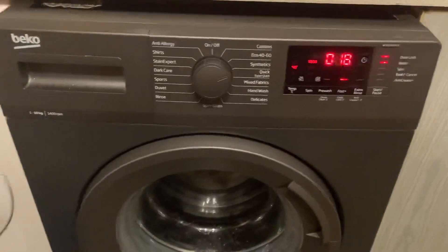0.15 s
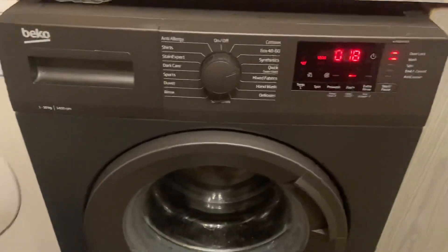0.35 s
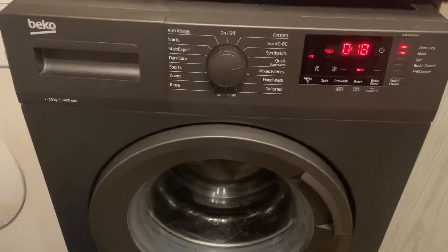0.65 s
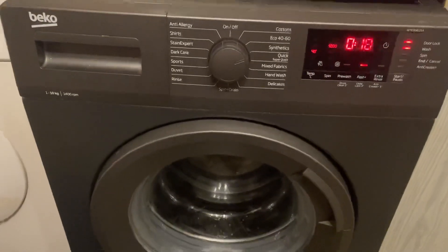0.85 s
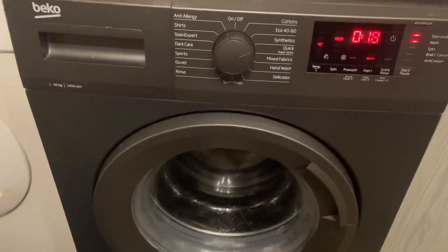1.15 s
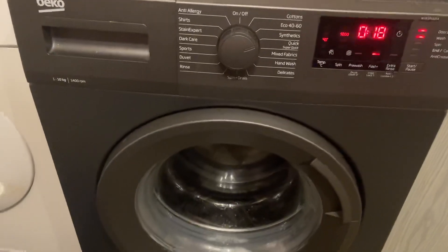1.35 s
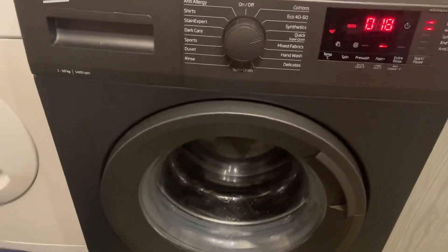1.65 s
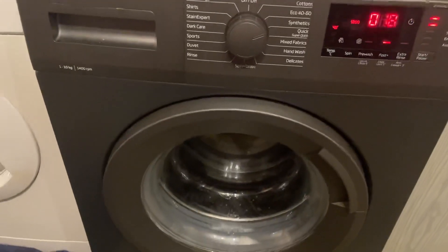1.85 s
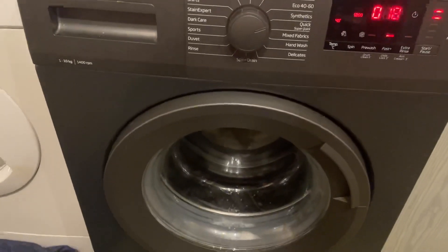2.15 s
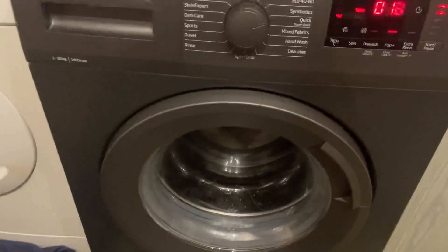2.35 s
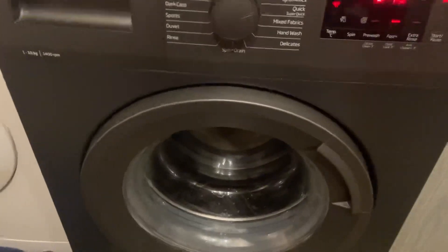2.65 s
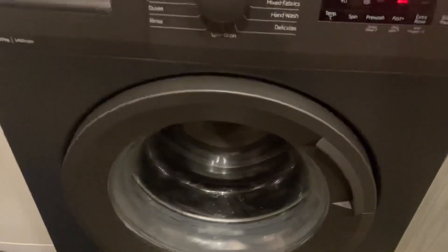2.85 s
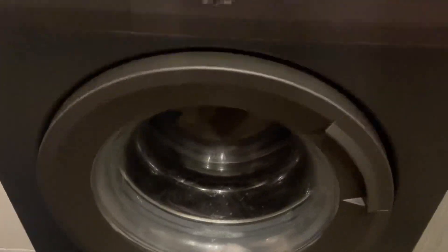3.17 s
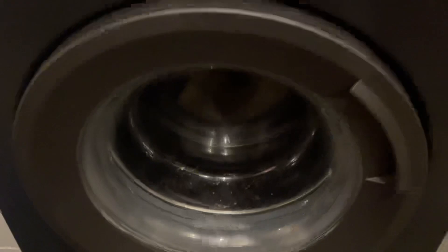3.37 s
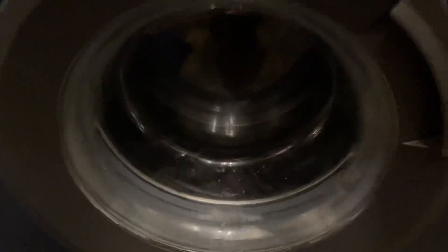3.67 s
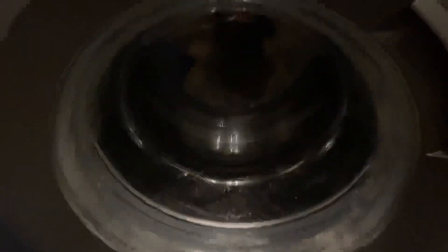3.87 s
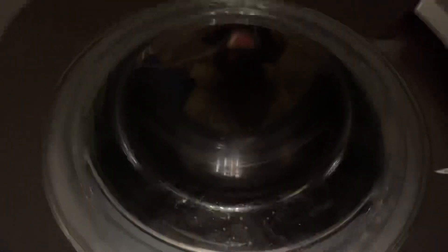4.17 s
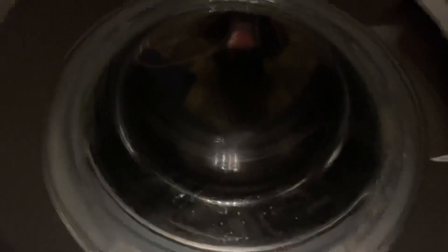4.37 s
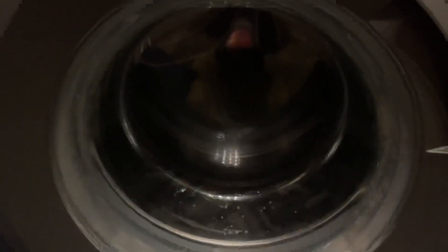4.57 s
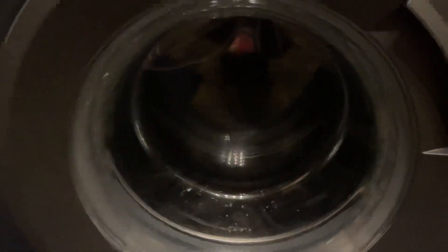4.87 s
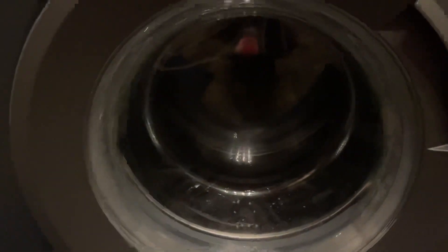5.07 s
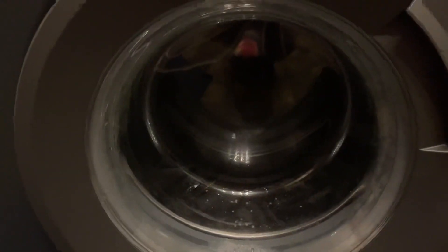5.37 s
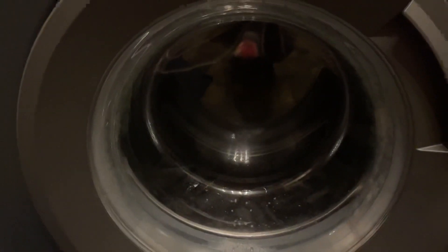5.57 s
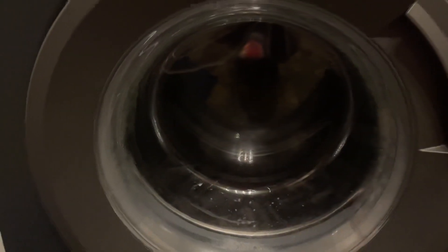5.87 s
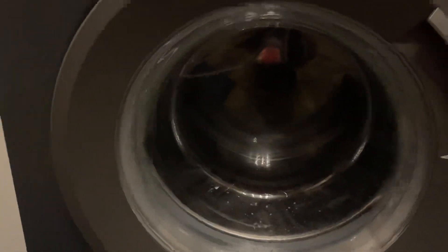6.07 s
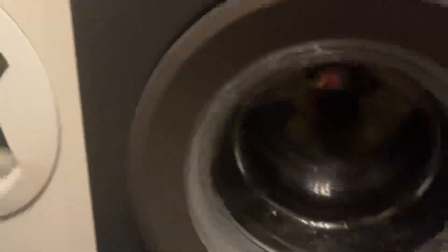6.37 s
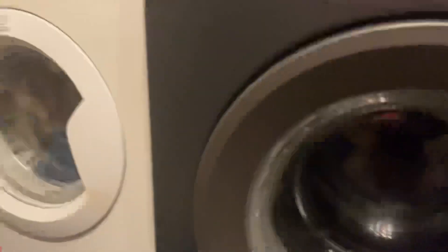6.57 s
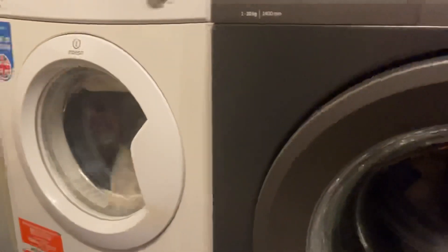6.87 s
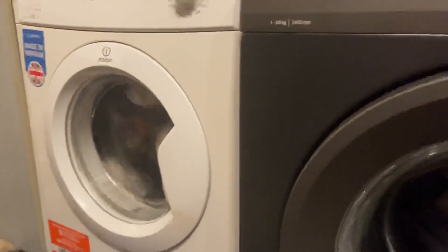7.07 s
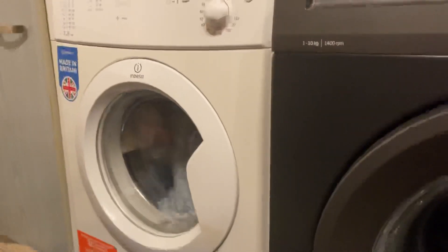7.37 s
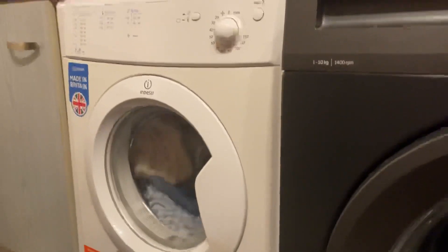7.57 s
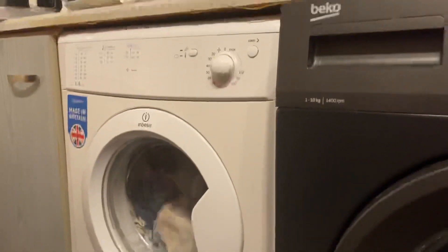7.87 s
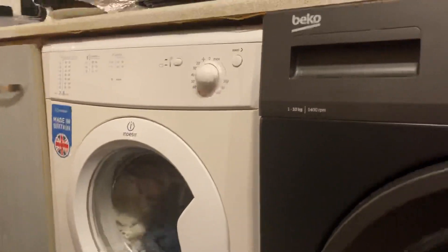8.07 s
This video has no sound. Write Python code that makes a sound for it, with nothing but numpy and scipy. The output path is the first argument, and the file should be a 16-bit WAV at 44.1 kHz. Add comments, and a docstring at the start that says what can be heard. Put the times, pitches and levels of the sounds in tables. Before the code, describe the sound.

Heard from a moving hand-held microphone in a small room, a washing machine and tumble dryer drone with rumbling rollers, fan roar and vent hiss. Tumbling clothes knock unevenly in the drum, with light metallic clicks and faint ringing taps that gather later on. Toward the end a brief low bump and two dry snaps sound nearby, the second sharper, and the drone turns quieter and duller.

```python
"""Tumble dryer and washing machine

Both run in a small room, heard from a hand-held phone that moves. Their motors hum at multiples of
the mains frequency, over rumbling rollers, fan roar and vent hiss. Laundry drops in the drum, buttons
clack on its steel, cloth swishes and one panel rings near 1 kHz. Near the end come a low bump and
two dry snaps close by, and the noise fades as the phone is lifted away."""
import sys
import numpy as np
from scipy import signal
from scipy.fft import rfft, irfft, next_fast_len
from scipy.io import wavfile
from scipy.ndimage import uniform_filter1d

SR = 44100
rng = np.random.default_rng(int(sys.argv[2]) if len(sys.argv) > 2 else 0)


def to_wav(s):
    """Save 16-bit WAV."""
    ch = np.atleast_2d(s).T  # columns
    pcm = np.round(np.clip(ch, -1, 1) * 32767)  # PCM
    wavfile.write(sys.argv[1], SR, pcm.astype(np.int16))


N = 362502

# Level changes as the phone is lowered and lifted: t/s, bass/dB, air noise/dB, roar/dB, top hiss/dB
PHONE_MOVES = [(0.0, -7, 3.5, 3, 2.5), (0.3, 1.5, 1, 2.5, 4), (0.6, -3.5, -3, -1.5, -1),
               (0.95, -3, -1.5, 0, -2), (1.4, -2.5, -2, -0.5, -2), (2.9, -0.5, 0, -0.5, 0.5),
               (3.7, 0.5, 0.5, -0.5, 1), (4.1, 1, 0, -1, 4), (4.6, 5.5, 2, 0, -0.5),
               (5.5, 1.5, 1, -0.5, -2.5), (6.7, 2.5, 0.9, 0, -4.5), (7.3, 1, 2.5, 0.5, -1),
               (7.42, 0, -0.5, -5.5, 1), (7.75, -8.5, -5.5, -5.5, -22), (8.22, -8, -6, -6, -23)]


def motors():
    """Magnetic pull makes tones at multiples of the mains frequency; the load makes them waver."""
    # tones the cabinets give off: multiple of the mains, level above the roar/dB, waver/dB
    cabinet_tones = [(5, -23.5, 5), (6, -19, -2.5), (7, -13, 2), (8, -23.5, 6.5)]
    # hum at twice the mains, as the phone crosses the room's standing waves: t/s, level/dB
    main_hum = [(0.0, -40), (0.8, -41), (1.3, -44), (1.7, -40.5), (2.25, -44.5), (3.05, -38.5), (3.4, -42),
                (3.75, -38.5), (4.2, -36), (4.9, -39.5), (5.27, -35), (5.55, -40), (6.05, -36.5),
                (7.17, -39), (7.42, -45), (7.8, -46), (8.1, -43.5), (8.22, -43.5)]
    # blurred overtones: t/s, third multiple/dB, fourth multiple/dB
    overtones = [(0.0, -60, -61), (0.7, -51, -54), (1.35, -57.5, -52.5), (2.5, -49.5, -54.5),
                 (2.85, -68, -54.5), (3.8, -47, -61), (4.5, -50.5, -64), (4.95, -46, -57), (5.7, -53, -62),
                 (6.9, -47, -65), (7.39, -54, -56), (7.8, -47.5, -62), (8.22, -50.5, -55)]
    mains_hz, roar_db = 49.95, -44.5 + curve(PHONE_MOVES, 3)
    turns = mains_hz * np.arange(N) / SR
    tones = [(2, curve(main_hum, 1), 1.3)]
    tones += [(k, db + roar_db, waver_db) for k, db, waver_db in cabinet_tones]
    hum = np.zeros(N)
    for k, db, waver_db in tones:
        level = gain_of(db + waver_db * wander(9))
        hum += np.sqrt(2) * level * np.sin(2 * np.pi * k * (turns + 0.03 * wander(3)))
    for k, width_hz, column in ((3, 13, 1), (4, 6, 2)):
        band = evened(resonate(rng.standard_normal(N), k * mains_hz, width_hz))
        hum += gain_of(curve(overtones, column)) * steadied(band, 0.6)
    return hum * panned(0.99)


def rollers_and_fan():
    """Drum rollers rumble, the steel cabinets roar with the fan, and air rushes and hisses in the vent."""
    # the tone colour of each noise: f/Hz, level/dB
    rumble = [(25, -49), (34, -33), (44, 3.5), (60, 1.5), (80, 3), (108, -1), (125, -5.5), (170, -8.5),
              (230, -20), (400, -64)]
    roar = [(88, -19.5), (150, -1.5), (183, -10.5), (297, -5), (345, -7), (388, -7.5), (490, -12),
            (555, -8.5), (808, -11.5), (955, -13.5), (1100, -25), (1430, -48), (2420, -120)]
    rush = [(600, -37), (1000, 1), (1350, -3.5), (1700, 0.5), (2400, -3), (3000, -5), (3800, -11),
            (6000, -21)]
    hiss = [(2000, -29), (3500, -6.5), (4500, 0), (6000, -2), (7000, -3.5), (9300, 3.5), (10200, -10),
            (11000, -50)]
    top_hiss = [(9500, -60), (10300, 5), (11500, 1), (13000, -25.5)]
    bass_db, air_db, roar_db, top_db = (curve(PHONE_MOVES, column) for column in (1, 2, 3, 4))
    tumbling = wander(12)  # the load shakes every cabinet at once
    return (room_noise(rumble, 0.5, -1.5, 4096) * gain_of(-46 + bass_db)
            + room_noise(roar, 0.5, 1.6, 2048) * gain_of(-44.5 + roar_db + 0.65 * tumbling)
            + room_noise(rush, 1.5, 1.7, 2048) * gain_of(-48.5 + 0.38 * air_db + 0.25 * tumbling)
            + room_noise(hiss, 2, 0.5, 1024) * gain_of(-59.5 + 0.83 * air_db + 0.3 * tumbling)
            + room_noise(top_hiss, 2.5, 1, 1024) * gain_of(-68 + top_db + 0.48 * tumbling))


def laundry_drops():
    """Falling laundry rings the drum, then the cabinet booms; harder items sound brighter."""
    # blows: t/s, peak/dB, boom/dB, brightness/(dB per octave), pitch favoured by the spot hit/Hz
    blows = [(0.188, -54, -50, 6, 2024), (0.389, -62, -35, 5, 2024), (1.349, -33.5, -56, -1, 1390),
             (2.019, -35.5, -36.5, 1, 640), (2.297, -44.5, -54, -2, 720), (2.573, -37.5, -46, -1.5, 645),
             (2.874, -40.5, -50, -2, 1000), (3.156, -42, -55, -14, 550), (3.637, -40, -48, -3, 1900),
             (3.688, -40, -49, 1, 2400), (4.522, -37, -55, -5.5, 750), (4.741, -29, -32.5, -1.5, 745),
             (5.687, -43, -38, 1, 968), (5.87, -43, -54, 1, 850), (6.379, -43, -52, 1, 550),
             (6.483, -40.5, -49, -8, 700), (7.081, -38, -52, -7, 720), (7.236, -36.5, -55, -2, 1570)]
    # the drum's resonances: f/Hz, width/Hz, level/dB
    drum_modes = [(425, 120, -1), (603, 110, 5), (723, 105, 8.5), (974, 170, 11), (1287, 120, 7),
                  (1560, 220, 8.5), (1990, 420, 8.5), (2570, 290, 6), (3330, 170, -3.5)]
    boom_hz, boom_lag_s = 239.4, 0.018
    out = np.zeros((2, N))
    for start, db, boom_db, tilt_db, spot_hz in blows:
        blow, shape = burst(0.013, t60=0.17, rise=0.0063, likeness=0.21)
        wall = 0
        for hz, width, mode_db in drum_modes:
            favour_db = 4.5 / (1 + (np.log2(hz / spot_hz) / 0.14) ** 2)
            level = gain_of(mode_db + tilt_db * np.log2(hz / 1000) + favour_db)
            wall += level * struck(resonate(blow, hz, width), shape)
        wall *= np.linalg.norm(shape) / np.linalg.norm(wall[0])
        add(out, start, gain_of(db) * wall * panned(6))
        blow, shape = burst(0.0045, t60=0.23, rise=0.0042)
        boom = 0.48 * evened(resonate(blow[0], boom_hz, width=160))
        boom += 0.67 * np.sin(2 * np.pi * boom_hz * np.arange(len(boom)) / SR)  # its lowest note
        add(out, start + boom_lag_s, gain_of(boom_db) * struck(boom, shape) * panned(2.1))
    return out


def button_clacks():
    """Buttons and zips scrape the steel drum, which rings; the treble dies away first."""
    # clacks: t/s, peak/dB, brightness/(dB per octave), time to fade 60 dB/s
    clacks = [(0.1932, -39, -7.5, .24), (0.253, -49, -7, .24), (0.378, -45.5, 1, .15),
              (2.014, -37, -2.5, 0.27), (2.572, -49, -2, 0.36), (2.885, -48, -7, .24),
              (2.9849, -36.5, -2, 0.24), (3.84, -37, -3, 0.24), (4.449, -46, -22, 0.21),
              (4.8415, -35, -5.5, .22), (6.475, -45, -5.5, 0.18)]
    # where the steel rings: f/Hz, width/Hz, boost/dB
    steel_modes = [(2270, 1400, 4), (2850, 330, 3.5), (4250, 920, 4), (5270, 230, 0.5), (8450, 430, 3),
                   (11400, 300, 4.5)]
    out = np.zeros((2, N))
    for start, db, tilt_db, t60 in clacks:
        scrape, shape = burst(0.015, t60, rise=0.0017)
        size = len(shape)
        bounces = evened(uniform_filter1d(rng.standard_normal(size), size=60))
        spectrum = rfft(scrape * gain_of(2.2 * bounces))
        hz = np.fft.rfftfreq(size, 1 / SR)
        spectrum *= gain_of(peaks_db(steel_modes, hz) + tilt_db * np.log2(np.maximum(hz, 2500) / 4000))
        spectrum *= hz ** 2 / (hz ** 2 + 120 ** 2)  # cuts the deep bass
        dull = 1 / (1 + (hz / 5500) ** 4)
        low, high = irfft(spectrum * dull, size), irfft(spectrum * (1 - dull), size)
        clack = np.std(low) * struck(low, shape) + np.std(high) * struck(high, shape ** 1.8)
        add(out, start, gain_of(db) * clack / np.std(low + high) * panned(3.5))
    return out


def drum_panel():
    """One panel sings softly, driven by fan noise, and rings out when it is tapped."""
    # the singing: t/s, level/dB
    singing = [(0.0, -64), (1.0, -61), (2.2, -69), (2.6, -55), (3.6, -56), (4.1, -51.5), (4.6, -58),
               (4.9, -54), (5.5, -55.5), (6.2, -53), (6.9, -50.5), (7.3, -60), (7.5, -58), (8.22, -68)]
    # taps: t/s, peak/dB, f/Hz
    taps = [(3.518, -41, 947), (3.639, -51, 906), (3.687, -48, 925), (3.744, -51, 976), (3.88, -40, 943),
            (5.343, -45.5, 943), (5.69, -45, 977), (5.868, -46, 900), (6.198, -45, 927), (6.267, -50, 930),
            (6.312, -43, 1000), (6.65, -41.5, 967), (7.082, -37, 975), (7.118, -46, 976), (7.161, -48, 952),
            (7.205, -47, 944), (7.237, -44, 970), (7.274, -49, 913)]
    note = evened(resonate(rng.standard_normal((2, N)), hz=949.3, width=39))
    out = steadied(note, 0.5) * gain_of(curve(singing, 1) + 3.5 * wander(16))
    t = np.arange(round(0.15 * SR)) / SR
    shape = envelope(t, hold=0.022, t60=0.09, rise=0.006)
    for start, db, hz in taps:
        rattle = evened(resonate(rng.standard_normal(len(t)), hz, width=210))
        overtone = evened(resonate(rng.standard_normal(len(t)), hz=2520, width=280))
        ring = 1.14 * np.sin(2 * np.pi * hz * t) + 0.66 * rattle + 0.2 * overtone
        add(out, start, gain_of(db) * struck(ring, shape) * panned(5.9))
    return out


def dry_snaps():
    """A sharp crack rings a small hollow body and leaves a faint tail in the room."""
    # snaps: t/s, peak/dB, fade/s, tail/dB, tail fade/s, hollow ring/dB, high ring/dB, pan/dB
    snaps = [(7.3957, -34, 0.03, -43, 0.11, -46, -38, 10),
             (7.6295, -21.5, 0.021, -39, 0.24, -36.5, -35, 4.5)]
    # the body's hollow and high notes: f/Hz, level/dB, time to fade 60 dB/s
    hollow_modes = [(490, -5, .045), (660, -2, .05), (840, -1, 0.045)]
    high_modes = [(1460, -18, .03), (2870, -5.5, 0.03), (3800, -5.5, .03), (6100, -5, .025)]
    out = np.zeros((2, N))
    t = np.arange(round(0.06 * SR)) / SR
    hollow, high = (sum(gain_of(db - 60 * t / t60) * np.sin(2 * np.pi * hz * t) for hz, db, t60 in modes)
                    for modes in (hollow_modes, high_modes))
    spike = gain_of(-5) * np.exp(-t[:8] / 0.00004)  # sharpens the first instant
    brighten = [1, -0.3]
    for start, db, t60, tail_db, tail_t60, hollow_db, high_db, pan_db in snaps:
        crack, shape = burst(0.00066, t60, rise=0.00042, likeness=0.19)
        crack = struck(signal.lfilter(brighten, [1], crack), shape)
        add(out, start, gain_of(db) * crack * panned(pan_db))
        add(out, start, gain_of(db) * spike * panned(pan_db))
        tail, shape = burst(0.004, tail_t60, rise=0.0012, likeness=0.23)
        add(out, start, gain_of(tail_db) * signal.lfilter(brighten, [1], tail) * shape)
        add(out, start + 0.002, gain_of(hollow_db) * hollow * panned(pan_db))
        add(out, start, gain_of(high_db) * high * panned(pan_db))
    return out


def cloth_swishes():
    """Sliding cloth makes soft swells of high noise."""
    # swishes: t/s, level/dB, rough length/s, f/Hz, width/Hz
    swishes = [(0.358, -37, 0.049, 11200, 4030), (2.045, -39, 0.049, 7550, 2000),
               (2.62, -50, 0.068, 10500, 3000), (4.054, -34.5, 0.058, 8800, 5170)]
    out = np.zeros((2, N))
    for start, db, length, hz, width in swishes:
        rub, shape = burst(length / 2, t60=3 * length, rise=0.052, likeness=0.08)
        add(out, start, gain_of(db) * evened(resonate(rub, hz, width)) * shape)
    return out


def low_bump():
    """One short swell of a low tone."""
    start_s, length_s, hz = 7.24, 0.13, 78
    out = np.zeros((2, N))
    t = np.arange(round(length_s * SR)) / SR
    swell = gain_of(-30.5) * np.sin(np.pi * t / length_s)
    add(out, start_s, swell * np.sin(2 * np.pi * hz * t) * panned(0.9))
    return out


def sparkles():
    """The brightest contacts add a faint wisp of noise above the hiss."""
    # wisps: t/s, peak/dB, rise/s, hold/s, f/Hz, width/Hz
    wisps = [(0.36, -69, .02, .035, 14200, 2500), (4.058, -69, .015, 0.046, 15000, 900),
             (4.84, -75, .005, .01, 14300, 2500), (7.629, -57, .0005, .004, 14300, 2500)]
    out = np.zeros((2, N))
    for start, db, rise, hold, hz, width in wisps:
        wisp, shape = burst(hold, t60=2 * rise + hold / 2, rise=rise)
        band = signal.butter(6, [hz - width / 2, hz + width / 2], "bandpass", fs=SR, output="sos")
        add(out, start, gain_of(db) * struck(signal.sosfilt(band, wisp[:1]), shape) * panned(0.5))
    return out


def room_noise(colour, patchy_db, ripple_db, size):
    """Noise from all around, with brief patches and narrow room peaks that drift as the phone moves."""
    # how alike left and right are: f/Hz, likeness (limited to -1..1 below)
    alike = [(60, 1), (130, 0.84), (280, 0.79), (590, 0.17), (1260, 0.15), (2710, 0.0015), (5800, 0.26),
             (12400, -1.41)]
    # how much louder the left is: f/Hz, level/dB
    left_louder = [(40, 0.5), (110, 2.5), (360, 2), (640, 2), (1160, 2.5), (2100, -1), (3800, 4),
                   (6870, 4.5), (9000, 0)]
    # how far the left runs ahead: f/Hz, phase/rad
    left_ahead = [(60, -0.091), (950, 0.1), (2760, 0.86), (7500, -0.9), (12600, 0.8)]
    # faint ringing of the air path: f/Hz, width/Hz, boost/dB
    duct_modes = [(1366, 47, 6), (2436, 34, 5)]
    hop, hz = size // 4, np.fft.rfftfreq(size, 1 / SR)
    a, b, c, d, patches, ripple = rng.standard_normal((N // hop + 5, len(hz), 6), dtype=np.float32).T
    patches = evened(uniform_filter1d(uniform_filter1d(patches, 10, 0), 8, 1))
    ripple = evened(uniform_filter1d(uniform_filter1d(ripple, 3, 0), SR // hop, 1))
    likeness = np.clip(at_pitch(alike, hz), -1, 1)[:, None]
    left = a + 1j * b
    right = likeness * left + np.sqrt(1 - likeness ** 2) * (c + 1j * d)
    right *= np.exp(-1j * at_pitch(left_ahead, hz))[:, None]
    lean = gain_of(at_pitch(left_louder, hz) / 2)[:, None]
    colour_db = (at_pitch(colour, hz) + peaks_db(duct_modes, hz))[:, None]
    level = gain_of(colour_db + patchy_db * patches + ripple_db * ripple)
    spectra = np.array([left * lean, right / lean]) * level
    out = signal.istft(spectra, nperseg=size, noverlap=size - hop)[1][:, :N]
    return out / np.sqrt(np.mean(out.mean(0) ** 2))


def stereo_colour(x, shared_colour):
    """Colours what left and right share, and separately what differs between them."""
    # bass cut and treble gaps in the part that differs: f/Hz, gain/dB
    apart_colour = [(25, -21), (40, 4.5), (8200, -7), (8450, -35), (8800, -35), (9100, -10.5),
                    (11400, -13.5), (11800, -58), (13000, -50)]
    size = next_fast_len(N + SR)
    hz = np.fft.rfftfreq(size, 1 / SR)
    left, right = rfft(x, size)
    shared = (left + right) / 2 * gain_of(at_pitch(shared_colour, hz))
    apart = (left - right) / 2 * gain_of(at_pitch(apart_colour, hz))
    return irfft(np.array([shared + apart, shared - apart]), size)[:, :N]


def burst(hold, t60, rise, likeness=0.2):
    """Stereo noise for one contact and, separately, its loudness shape."""
    pair = rng.standard_normal((2, SR // 2))[:, :round((hold + t60) * SR)]
    pair[1] = likeness * pair[0] + np.sqrt(1 - likeness ** 2) * pair[1]
    return pair, envelope(np.arange(pair.shape[1]) / SR, hold, t60, rise)


def envelope(t, hold, t60, rise):
    """A loudness shape that rises and, after hold seconds, fades by 60 dB every t60 seconds."""
    return (1 - np.exp(-t / rise)) * gain_of(-60 * np.maximum(t - hold, 0) / t60)


def struck(x, shape):
    """Gives x a loudness shape, with the same energy whatever the noise happens to do."""
    return x * shape * np.sqrt(np.sum(shape ** 2) / np.mean(np.sum((x * shape) ** 2, -1)))


def resonate(x, hz, width):
    """Keeps a band around hz: shifts it down to zero, smooths and shifts back, twice over."""
    turn = np.exp(2j * np.pi * hz * np.arange(x.shape[-1]) / SR)
    pole = np.exp(-np.pi * width / SR)
    for _ in range(2):
        x = 2 * (turn * signal.lfilter([1 - pole], [1, -pole], x / turn)).real
    return x


def steadied(x, share):
    """Evens out the swells of a narrow band of noise; share runs from 0 (off) to 1 (strong)."""
    swells = np.abs(signal.hilbert(x, next_fast_len(N))[..., :N])
    return evened(x / (swells + 0.1) ** share)


def wander(top_hz):
    """A slow random drift of typical size 1."""
    t = np.arange(0, N, 64) / SR
    slow = sum(np.sin(2 * np.pi * (f * t + rng.random())) / np.sqrt(f)
               for f in np.geomspace(0.5, top_hz, 24))
    return np.interp(np.arange(N) / SR, t, evened(slow))


def peaks_db(modes, hz):
    """The peaks that resonances add to a spectrum."""
    return sum(db / (1 + ((hz - mode_hz) / width) ** 2) for mode_hz, width, db in modes)


def at_pitch(points, hz):
    """Reads a table along a logarithmic frequency axis."""
    f, value = np.transpose(points)
    return np.interp(np.log(hz + 1), np.log(f + 1), value)


def curve(table, column):
    """One column of a time table, sample by sample."""
    rows = np.array(table)
    return np.interp(np.arange(N) / SR, rows[:, 0], rows[:, column])


def add(mix, start_s, sound):
    """Mixes in a stereo sound."""
    part = mix[:, round(start_s * SR):][:, :sound.shape[1]]
    part += sound[:, :part.shape[1]]


def panned(pan_db):
    """Left and right gains; positive is to the left."""
    return gain_of([[pan_db / 2], [-pan_db / 2]])


def evened(x):
    """Scales to an average level (rms) of 1."""
    return x / np.sqrt(np.mean(x ** 2) + 1e-20)


def gain_of(db):
    """Decibels to amplitude."""
    return 10 ** (np.asarray(db) / 20)


def scene():
    """All the sources as they reach the phone."""
    # bass cut and treble gaps in the steady sound both sides share: f/Hz, gain/dB
    steady_colour = [(25, -18), (40, 2.5), (9400, -2.5), (9750, -6), (10250, -53), (10600, -9), (11000, 1),
                     (11800, -3), (12200, -34), (12500, -60)]
    # shallower treble gaps for the hits: f/Hz, gain/dB
    hit_colour = [(40, 1.5), (9400, -2.5), (10150, -23), (10900, -1.5), (11800, -1.5), (12300, -11),
                  (12700, -36), (13100, -70)]
    hits = button_clacks() + dry_snaps() + laundry_drops() + drum_panel() + cloth_swishes() + low_bump()
    steady = motors() + rollers_and_fan()
    return stereo_colour(steady, steady_colour) + stereo_colour(hits, hit_colour) + sparkles()


def record(dry):
    """Cuts the treble above 16 kHz."""
    low_pass = signal.firwin(511, 16000, window=("kaiser", 9), fs=SR)
    return signal.oaconvolve(dry, low_pass[None], "same")


dry = scene()
out = record(dry)
to_wav(out)
```